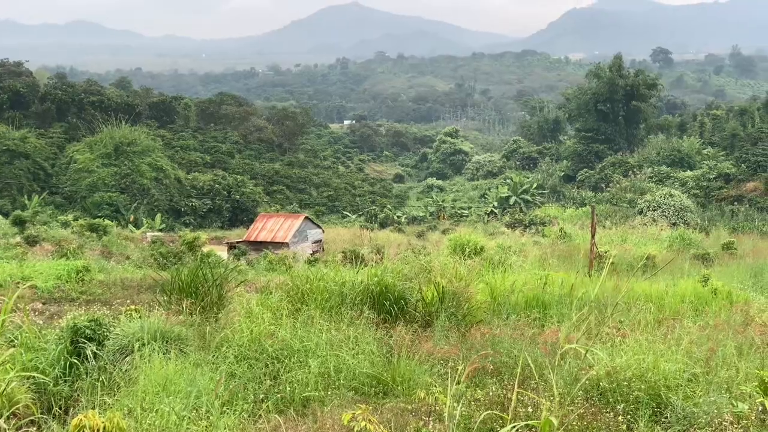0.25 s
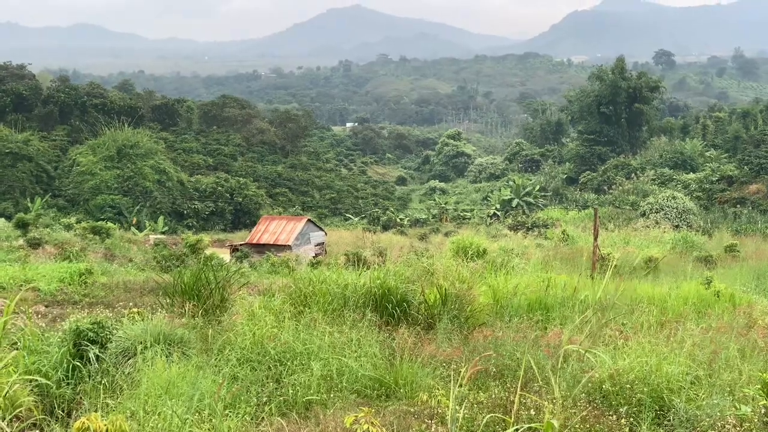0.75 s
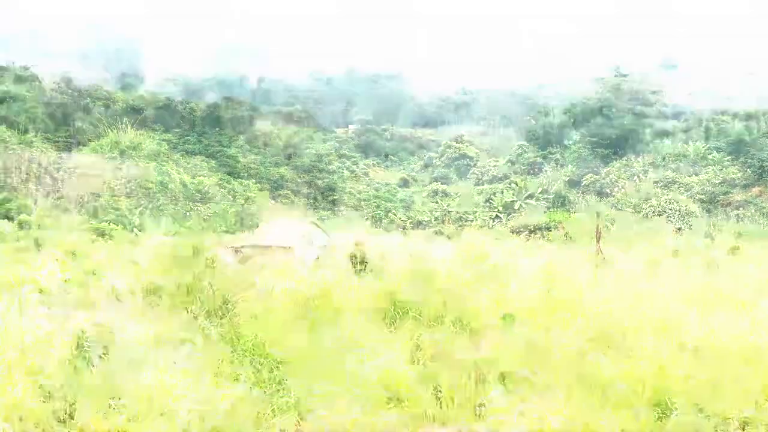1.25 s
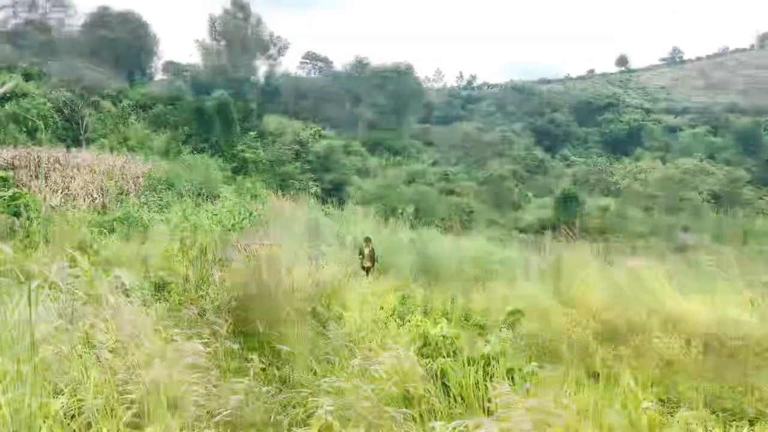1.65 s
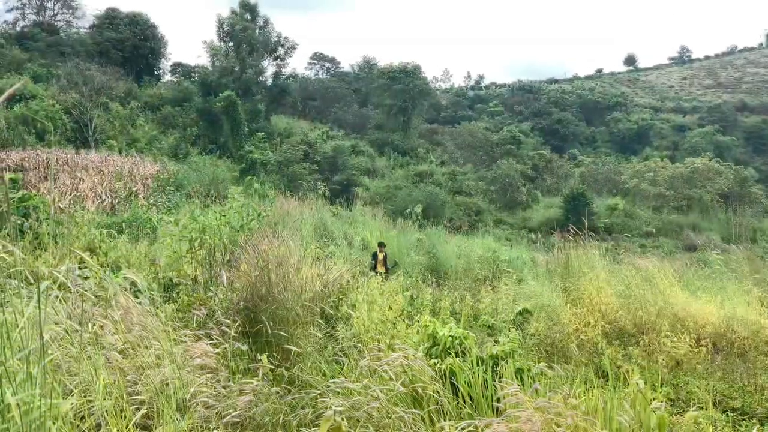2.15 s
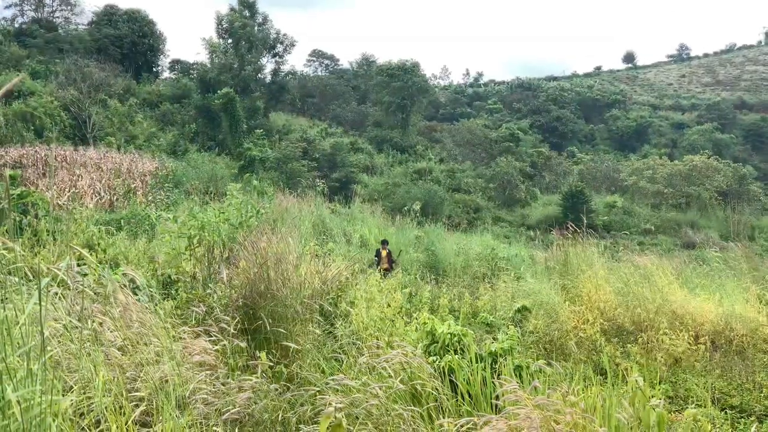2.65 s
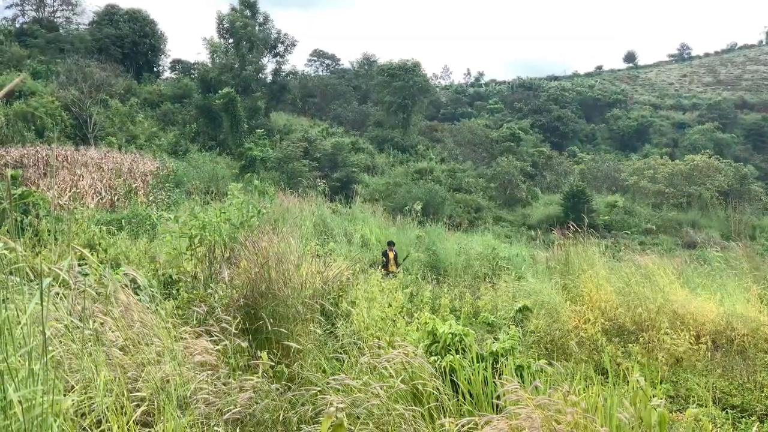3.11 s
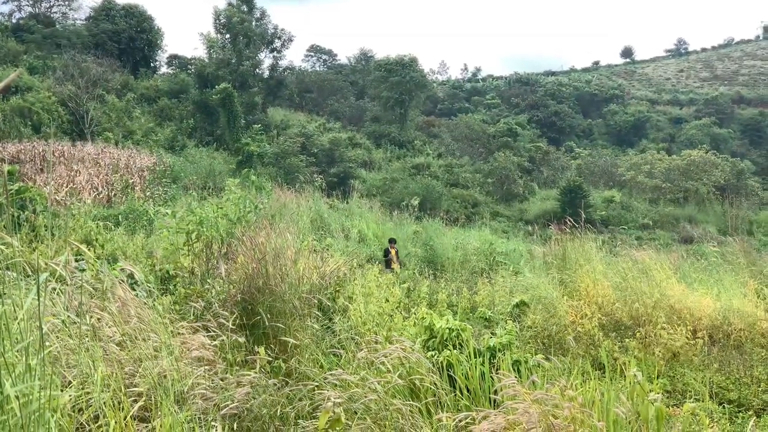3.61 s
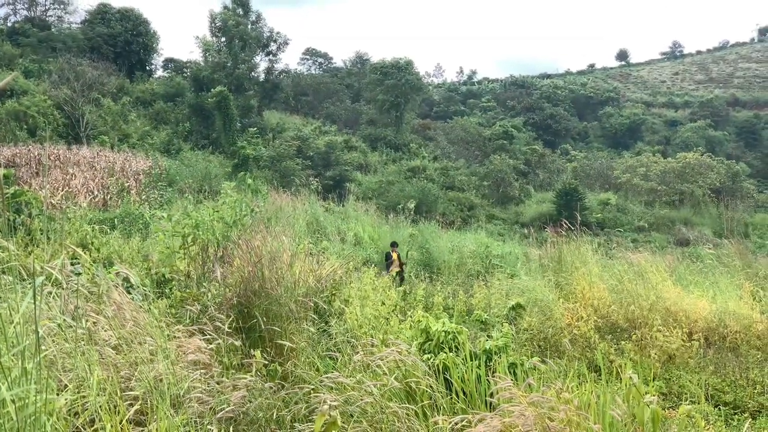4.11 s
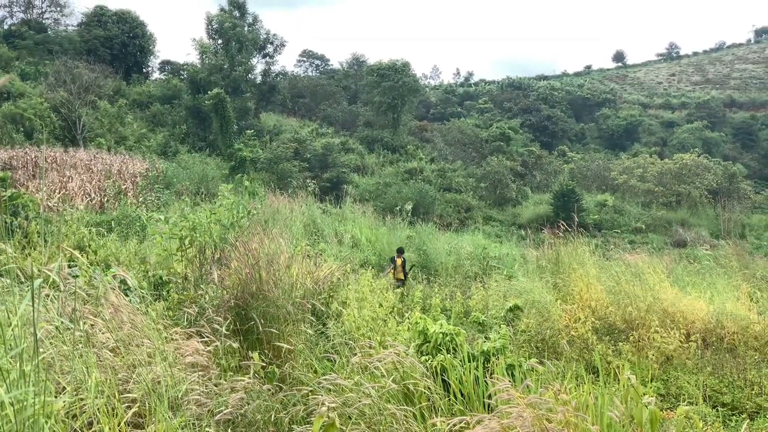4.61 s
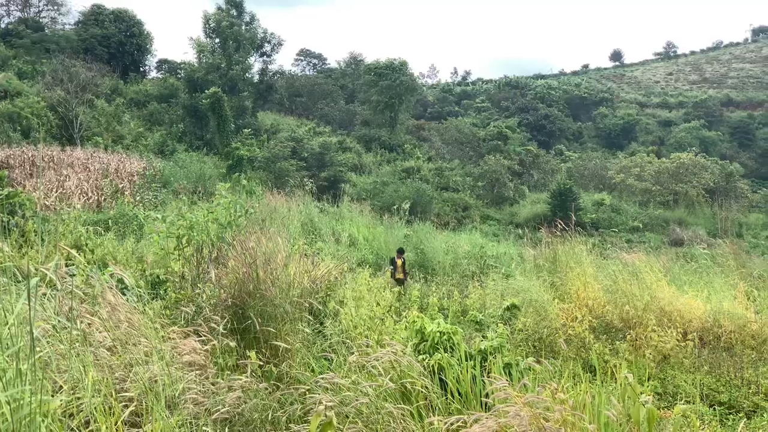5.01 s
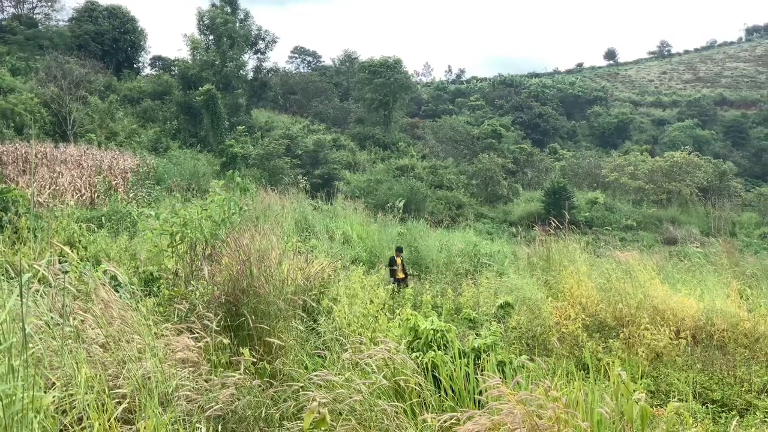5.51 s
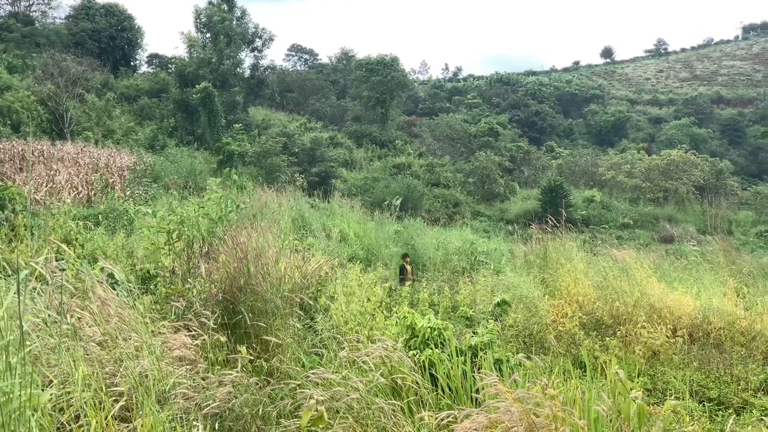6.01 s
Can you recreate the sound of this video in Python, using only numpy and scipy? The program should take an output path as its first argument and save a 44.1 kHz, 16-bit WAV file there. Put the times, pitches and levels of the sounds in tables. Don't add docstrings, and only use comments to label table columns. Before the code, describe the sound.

A quiet outdoor stereo pickup starts with low chugging engines, hum and thin insects, overlaps briefly with a second field, then drops the engines. A deep distant drone swells irregularly beneath continuous high cicada buzz, hissing katydids and pulsing crickets. Near the middle a bird gives a husky flurry of upward slurs and several shorter chips. Dry stems tick in a light breeze.

```python
import sys
import numpy as np
from scipy import signal
from scipy.fft import rfft, irfft, next_fast_len
from scipy.io import wavfile
from scipy.ndimage import uniform_filter1d

SR = 44100
rng = np.random.default_rng(int(sys.argv[2]) if len(sys.argv) > 2 else 0)


def how_loud(loudness_db):
    steps = np.asarray(loudness_db, float) / 20
    return 10 ** steps


def digitize_waveform(pressure):
    field = np.atleast_2d(pressure).T
    bounded = np.clip(field, -1, 1)
    quanta = np.round(bounded * 32767).astype(np.int16)
    wavfile.write(sys.argv[1], SR, quanta)


N = 276066
T = np.arange(N) / SR
M = next_fast_len(N, True)
F = np.maximum(np.arange(M // 2 + 1) * SR / M, 1.)

FIRST_END_S, SECOND_START_S = 1.8, 0.7974

QUICK_HZ, QUICK_PIPE = 28.96, [(287.3, 56, 0), (347, 50, -4), (500, 95, -15.5), (766, 590, -26)]
SLOW_HZ, SLOW_PIPE = 13.8, [(163, 36, 0), (94, 52, -6.5)]

SHAFT_HZ, HARMONICS = 96.95, [(1, -72.5), (6, -80), (7, -81), (8, -84), (9, -85.5), (12, -99)]

# (time_s, level_db)
DRONE_CARRY = [(.8, -41.5), (1.0, -51), (1.22, -43.5), (1.5, -56.5), (2.0, -67), (2.4, -55.5), (3.0, -57),
               (3.28, -53.5), (3.34, -42), (3.75, -43.5), (4.25, -42), (4.55, -49), (4.9, -55),
               (5.42, -40.5), (5.55, -45.5), (5.76, -41), (6.1, -47), (6.26, -58)]
DRONE_START_HZ, DRONE_RISE_HZ_PER_S, DRONE_TOP_HZ = 63.74, 1.2, 69.1
DRONE_BLUR_DB, DRONE_WASH_DB = -11.5, -56.5

# (drum_hz, width_hz, click_rate_hz, level_db, right_lag_ms)
CICADA_DRUMS = [(6180, 160, 56.3, -4, 0.314), (6286, 240, 75, -7, 0.306), (5990, 420, 110, -4, 0.3),
                (6250, 480, 37, -6.5, 0.17)]
CICADA_DB = -68

# (frequency_hz, level_db per Hz)
KATYDID_SPECTRUM = [(7600, -43), (8100, -17.5), (8800, -25), (9500, -18.5), (11000, -15), (12500, -11.5),
                    (14000, -4), (15000, -4), (15700, 3.5), (16500, -5.5)]
KATYDID_DB = -66.5

CHIRP_FIRST_S, CHIRP_PERIOD_S, CHIRP_PAIR_S = .903, .2184, 0.047
CHIRP_DB, CHIRP_PEAK_S, CHIRP_FADE_DB_PER_S, CHIRP_SCATTER_DB = -61, 3.8, 1.3, 1.0

FAR_BEATS_S = [s for s in .7645 + .2295 * np.arange(24) if not 2.7 < s < 4.85]

# (centre_s, peak_db, half_length_s)
CRICKET_BEADS = [(0.83, -75, 0.011), (0.972, -82, 0.018), (1.128, -76, 0.013), (1.218, -72, 0.0074),
                 (1.277, -78, 0.028), (1.377, -76, 0.012), (1.543, -82, 0.012), (1.64, -82, 0.009),
                 (1.67, -76, 0.0099), (1.777, -78, 0.011), (1.864, -74, 0.012), (1.998, -80, 0.012),
                 (2.736, -72, 0.016), (2.784, -76, 0.008), (2.862, -75, 0.01), (2.919, -79, 0.018),
                 (3.034, -77, 0.012), (3.073, -81, 0.014), (3.12, -79, 0.013), (3.335, -75, 0.01),
                 (3.377, -78, 0.014), (3.451, -76, 0.012), (3.588, -78, 0.016), (3.771, -78, 0.019),
                 (3.834, -77, 0.016), (3.934, -82, 0.011), (4.17, -79, 0.0087), (4.205, -76, 0.0089),
                 (4.247, -78, 0.014), (4.303, -70, 0.014), (4.354, -73, 0.012), (4.403, -71, 0.0097),
                 (4.441, -80, 0.0073), (4.466, -76, 0.0082), (4.527, -75, 0.019), (4.583, -77, 0.012),
                 (4.633, -79, 0.013), (4.724, -78, 0.01), (4.761, -75, 0.013), (4.856, -74, 0.012),
                 (4.884, -74, 0.006), (4.915, -77, 0.008), (5.008, -74, 0.01), (5.032, -74, 0.01),
                 (5.181, -74, 0.012), (5.246, -79, 0.018), (5.295, -74, 0.008), (5.4, -76, 0.019),
                 (5.481, -75, 0.0073), (5.51, -71, 0.0092), (5.616, -78, 0.01), (5.683, -85, 0.02),
                 (5.773, -82, 0.023), (5.856, -82, 0.019), (5.934, -75, 0.012), (5.989, -74, 0.017),
                 (6.07, -81, 0.012), (6.135, -78, 0.012), (6.207, -72, 0.01), (6.236, -72, 0.01)]

# (start_s, length_s, start_hz, end_hz, peak_db)
SLURRED_NOTES = [(2.148, 0.062, 3390, 3420, -65.5), (2.198, 0.032, 3440, 3500, -63),
                 (2.222, 0.023, 3280, 3890, -62.5), (2.152, .07, 4020, 3700, -68),
                 (2.14, .1, 5000, 5150, -72), (2.284, 0.027, 3050, 3450, -66),
                 (2.297, 0.052, 3350, 3680, -60.5), (2.314, .078, 2800, 3950, -65.5),
                 (2.345, .045, 3900, 4330, -63), (2, 0.059, 3900, 4400, -69),
                 (2.353, 0.0204, 1800, 2230, -62.5), (2.417, 0.067, 3240, 4900, -64.5),
                 (2.435, 0.08, 3000, 4450, -59), (2.485, 0.051, 3800, 3900, -64.5),
                 (2.464, 0.0454, 2000, 2280, -62), (2.568, 0.076, 3000, 5700, -59),
                 (2.58, 0.045, 3000, 4500, -60.5), (2.588, 0.0403, 1950, 2600, -61.5),
                 (2.618, 0.026, 2100, 3350, -62.5), (2.6, 0.044, 4100, 5900, -63)]

# (start_s, length_s, top_hz, peak_db)
HOOKED_CHIPS = [
    (2.736, .062, 3400, -60),
    (2.889, .044, 3520, -60),
    (3.011, .04, 3420, -64.5),
    (3.122, .04, 3280, -66),
    (3.226, .042, 3250, -68),
    (3.33, .038, 3150, -68),
]
CHIP_START_HZ, CHIP_HOOK_HZ, CHIP_TURN = 1500, 700, .68
HAZE_T60_S, HAZE_DB, RASP_DB = .22, -30.5, 1.5

# (start_s, peak_db, rustle_length_s)
GRASS_TICKS = [(1.655, -68.5, 0.054), (2.14, -74, 0.034), (2.4886, -72, 0.025), (3.0076, -86, 0.036),
               (3.252, -71, 0.026), (3.508, -70, 0.029), (3.775, -70, 0.0319), (4.3, -66.5, 0.035),
               (4.3615, -67, 0.03), (4.681, -90, 0.028), (5.2021, -89, 0.028), (5.853, -65.5, 0.016)]

# (centre_s, half_length_s, level_db)
GUSTS = [
    (2.768, 0.054, -76),
    (4.327, 0.13, -74.5),
]

# (start_s, length_s, start_hz, end_hz, peak_db)
FAR_WHISTLES = [
    (.62, .09, 3250, 3350, -80),
    (3.331, .018, 1800, 2450, -71),
    (5.985, .025, 3250, 2650, -79),
    (3.37, .16, 2300, 1950, -85),
    (5.375, .135, 4000, 5550, -80.5),
]
TWITTER_FIRST_S, TWITTER_PERIOD_S, TWITTER_NOTE_S = 5.782, .068, .026
TWITTER_HZ, TWITTER_DROP_HZ = 2900, 260
TWITTER_DB, TWITTER_FADE_DB_PER_NOTE = -78.5, 1.2

# (time_s, level_db against calm)
BREEZE_SWELL = [(.8, -1), (2.0, -1), (2.5, -1.5), (3.4, 3.5), (3.9, 2.5), (4.65, -2.5), (5.4, 3.5),
                (5.7, 1), (6.26, 0.5)]

# (frequency_hz, level_db per Hz)
FIRST_AIR, FIRST_AIR_SIDE = [(25, -20), (45, -0.5), (70, 2), (130, -6), (250, -11), (450, -20.5),
                             (1000, -33), (2000, -32), (3200, -35), (5200, -33.5), (6900, -88)], [(15, -46), (25, -12), (57, 8), (95, -8.5), (305, -4.5),
                                           (436, -13.5), (2280, -22.5), (5200, -24), (6760, -56),
                                           (7400, -100)]
SECOND_AIR, SECOND_AIR_SIDE = [(25, -35), (50, -6.5), (80, -6.5), (130, -14.5), (200, -24.5), (300, -26),
                               (450, -28), (750, -36.5), (1020, -33.5), (1500, -41.5), (2100, -40.5),
                               (2900, -48), (5200, -50), (7000, -104)], [(25, -25), (75, -7.5), (220, -26), (1000, -28.5), (2000, -30),
                                             (3000, -38), (5200, -40), (7000, -91)]
FIRST_AIR_DB, FIRST_AIR_SIDE_DB = -58, -65.5
SECOND_AIR_DB, SECOND_AIR_SIDE_DB = -55.5, -69.5

# (frequency_hz, threshold_db)
DROPOUT_THRESHOLD = [(2300, -80), (2700, -13.5), (3700, -13), (4300, -13.5), (4800, -13), (5300, -16),
                     (5700, -21), (6600, -20), (7150, -16), (7380, -9.5), (7550, -13.5), (7750, -17),
                     (8150, -15), (8500, -6), (8900, -3), (9600, -7.5), (10700, -7.5), (11700, -5),
                     (15000, -11)]


def level(x, db):
    return x * how_loud(db) / np.sqrt(np.mean(x ** 2))


def shape(points):
    hz, db = np.transpose(points)
    return how_loud(np.interp(np.log(F), np.log(hz), db))


def ring(hz, width):
    return 1 / (1 + 1j * (F ** 2 - hz ** 2) / (F * width)) ** 2


def filtered(x, response):
    return irfft(rfft(x, M) * response, M)[..., :N]


def ports(x, lag_ms, pan_db=0.):
    right = filtered(x, np.exp(-2j * np.pi * F * lag_ms / 1000))
    return np.array([x * how_loud(pan_db / 2), right * how_loud(-pan_db / 2)])


def walk(rate):
    hold = int(SR / rate)
    steps = np.repeat(rng.standard_normal(N // hold + 1), hold)
    return 1.3 * uniform_filter1d(uniform_filter1d(steps, hold), hold)[:N]


def phase(hz, wander):
    return np.cumsum(hz * (1 + wander * walk(12))) / SR


def pulses(rows):
    gate = np.zeros(N + SR)
    reach = np.arange(-4000, 4000)
    for s, db, half_s in rows:
        gate[int(s * SR) + reach] += how_loud(db) * np.exp(-(reach / SR / half_s) ** 2)
    return gate[:N]


def engine(hz, first_s, pipe, db):
    at = np.flatnonzero(np.diff(np.floor(phase(hz, 0.002) - hz * first_s)))
    bangs = np.zeros(N)
    bangs[at] = how_loud(rng.standard_normal(len(at)))
    response = sum((-1) ** k * how_loud(g) * ring(f, w) for k, (f, w, g) in enumerate(pipe))
    return level(filtered(bangs, response), db)


def generator():
    turns = phase(SHAFT_HZ, 0.00091)
    hum = 0
    for k, db in HARMONICS:
        hum = hum + how_loud(db + 2.0 * walk(8.6)) * np.sqrt(2) * np.sin(2 * np.pi * k * turns)
    return hum


def drone():
    hz = np.minimum(DRONE_START_HZ + DRONE_RISE_HZ_PER_S * (T - SECOND_START_S), DRONE_TOP_HZ)
    tone = np.sqrt(2) * np.sin(2 * np.pi * phase(hz, 0.015)) * how_loud(1.3 * walk(9))
    low_band = ring(62.6, 30)
    blur = level(filtered(rng.standard_normal(N), low_band), DRONE_BLUR_DB)
    wash = level(filtered(rng.standard_normal(N), low_band), DRONE_WASH_DB)
    return (tone + blur) * how_loud(np.interp(T, *np.transpose(DRONE_CARRY))) + wash


def far_chorus(hz, width, db):
    noise = rng.standard_normal((2, N))
    return level(filtered(noise, ring(hz, width)) * how_loud(0.86 * walk(30)), db)


def cicadas():
    out = far_chorus(6330, 800, -4)
    for hz, width, rate, db, lag_ms in CICADA_DRUMS:
        volley = np.exp(0.7 * np.cos(2 * np.pi * phase(rate, 0.0087))) * rng.standard_normal(N)
        out = out + ports(level(filtered(volley, ring(hz, width)), db), lag_ms, -2.4)
    return out


def katydids(throb):
    hiss = shape(KATYDID_SPECTRUM)
    scrape = np.exp(throb * np.cos(2 * np.pi * phase(36, .03)) + .1 * walk(8) + .16 * walk(18))
    near = ports(level(filtered(scrape * rng.standard_normal(N), hiss), 0), -.3008)
    return near + level(filtered(rng.standard_normal((2, N)), hiss), -17.5)


def chirping_cricket():
    beats = CHIRP_FIRST_S + CHIRP_PERIOD_S * np.arange(25)
    starts = np.concatenate([beats, beats + CHIRP_PAIR_S])
    db = CHIRP_DB - CHIRP_FADE_DB_PER_S * abs(starts - CHIRP_PEAK_S)
    db = db + CHIRP_SCATTER_DB * rng.standard_normal(len(starts))
    near_rows = [(s, g, .014) for s, g in zip(starts, db)]
    far_rows = [(s + gap, -70, .014) for s in FAR_BEATS_S for gap in (0, .054)]
    gate = pulses(near_rows + far_rows)
    tone = gate * how_loud(3 + 2 * walk(150)) * np.sin(2 * np.pi * phase(7225, .004))
    scattered = filtered(gate * rng.standard_normal((2, N)), ring(7200, 190))
    return ports(tone, .345, -4.0) + how_loud(12.5) * scattered + far_chorus(6950, 420, -79)


def low_cricket():
    swell = pulses(CRICKET_BEADS) + how_loud(-84 + 4 * walk(30))
    strength = how_loud(-.5 + 1.5 * walk(90) - 2.5 * (T < 3.3))
    return swell * strength * np.sin(2 * np.pi * phase(4002, .003))


def trill(hz, db, depth, rate, uneven_db):
    beat = 1 - depth * np.cos(np.pi * phase(rate, 0.18)) ** 2
    return beat * how_loud(db + uneven_db * walk(22)) * np.sin(2 * np.pi * phase(hz, .001))


def slurs():
    song, effort = np.zeros((2, N))
    for s, length, start_hz, end_hz, db in SLURRED_NOTES:
        u = np.clip((T - s) / length, 0, 1)
        swell = how_loud(db) * abs(np.sin(np.pi * u)) ** .7
        song += swell * np.sin(2 * np.pi * np.cumsum(start_hz + (end_hz - start_hz) * u) / SR)
        effort += swell * (start_hz > 2500)
    return song, effort


def chips():
    out = np.zeros(N)
    rise = CHIP_TURN ** 2
    hook = CHIP_HOOK_HZ / (1 - CHIP_TURN) ** 2
    for s, length, top_hz, db in HOOKED_CHIPS:
        u = np.clip((T - s) / length, 0, 1)
        bend = np.where(u < CHIP_TURN, (top_hz - CHIP_START_HZ) / rise, hook)
        hz = top_hz - bend * (u - CHIP_TURN) ** 2
        flutter = 1 + .6 * u * np.sin(2 * np.pi * 400 * T)
        swell = how_loud(db) * flutter * abs(np.sin(np.pi * u)) ** .45
        out += swell * np.sin(2 * np.pi * np.cumsum(hz) / SR)
    return out


def bird():
    song, effort = slurs()
    throat = .75 * abs(ring(3400, 900)) + .35 * abs(ring(2480, 300)) + .9 * abs(ring(2000, 350)) + .35
    song, chip = filtered(np.array([song, chips()]) * how_loud(2.8 * walk(300)), throat)
    chip = chip + how_loud(-19) * filtered(np.roll(chip, int(.046 * SR)), ring(3400, 700))
    song = song + how_loud(RASP_DB) * filtered(effort * rng.standard_normal(N), ring(4200, 1300))
    age = T[:SR // 4]
    haze = rng.standard_normal((2, len(age))) * np.exp(-np.log(1000) * age / HAZE_T60_S)
    scattered = how_loud(HAZE_DB) * filtered(song + chip, rfft(haze, M))
    return ports(song, .31, -1.5) + how_loud(3) * ports(chip, 1.2) + scattered


def grass():
    gate = np.zeros(N)
    for s, db, length in GRASS_TICKS:
        age = np.maximum(T - s, 0)
        decay = np.exp(-age / 0.0041) + 0.29 * np.exp(-age / length)
        gate += (T >= s) * how_loud(db) * decay
    for s, half_s, db in GUSTS:
        gate += how_loud(db) * np.exp(-((T - s) / half_s) ** 4)
    grains = rng.standard_normal(N) * how_loud(2.2 * rng.exponential(size=N))
    rustle = level(filtered(grains, ring(9000, 6000) + .5 * ring(4000, 2000)), 0)
    return ports(rustle * gate, -.2)


def far_birds():
    twitter = []
    for k in range(7):
        db = TWITTER_DB - TWITTER_FADE_DB_PER_NOTE * abs(k - 3)
        start_s = TWITTER_FIRST_S + k * TWITTER_PERIOD_S
        twitter.append((start_s, TWITTER_NOTE_S, TWITTER_HZ, TWITTER_HZ - TWITTER_DROP_HZ, db))
    out = 0
    for s, length, start_hz, end_hz, db in [*FAR_WHISTLES, *twitter]:
        u = np.clip((T - s) / length, 0, 1)
        turns = np.cumsum(start_hz + (end_hz - start_hz) * u) / SR
        out = out + how_loud(db) * np.sqrt(abs(np.sin(np.pi * u))) * np.sin(2 * np.pi * turns)
    return out * how_loud(4 * walk(200))


def air(mid, side, mid_db, side_db, breeze_db):
    noise = rng.standard_normal((2, N))
    common = level(filtered(noise[0], shape(mid)), mid_db)
    differing = level(filtered(noise[1], shape(side)), side_db)
    spectra = rfft([common, differing], M)
    place = np.clip(1.5 * np.log2(F / 100), 0, 9)
    bed = 0
    for k in range(10):
        register = irfft(spectra * np.maximum(1 - abs(place - k), 0), M)[:, :N]
        swell = breeze_db * np.interp(k, [0, 2, 4, 6], [0, 1, 1, .1])
        bed = bed + register * how_loud(swell + 1.86 * walk(4.48) + 2.0 * walk(15))
    return np.array([bed[0] + bed[1], bed[0] - bed[1]])


def first_field():
    engines = engine(QUICK_HZ, .01, QUICK_PIPE, -65) + engine(SLOW_HZ, 0.02395, SLOW_PIPE, -62.5)
    out = ports(engines + generator(), 0.018, -0.17)
    out = out + far_chorus(5940, 570, -64.0) + ports(far_chorus(6205, 170, -66.5)[0], 0.304, -2.0)
    out = out + how_loud(-70.5) * katydids(0.18) + far_chorus(8050, 500, -84)
    return out + air(FIRST_AIR, FIRST_AIR_SIDE, FIRST_AIR_DB, FIRST_AIR_SIDE_DB, 0)


def second_field():
    out = ports(drone(), 0.011, -2.4)
    out = out + cicadas() * how_loud(CICADA_DB + 0.69 * walk(3))
    out = out + katydids(0.15) * how_loud(KATYDID_DB + walk(8) + 1.2 * walk(20))
    out = out + chirping_cricket() + ports(low_cricket(), 0.032, 0.9)
    out = out + far_chorus(8080, 700, -81.5) + far_chorus(7700, 250, -90)
    out = out + ports(trill(7884, -83.5, .9, 35.5, 3.5), -0.0042, -1.2) + bird()
    breeze_db = np.interp(T, *np.transpose(BREEZE_SWELL))
    return out + air(SECOND_AIR, SECOND_AIR_SIDE, SECOND_AIR_DB, SECOND_AIR_SIDE_DB, breeze_db)


def scene():
    leaving = np.clip((FIRST_END_S - T) / 0.0048, 0, 1)
    entering = np.clip((T - SECOND_START_S) / 0.0174, 0, 1)
    fields = first_field() * leaving + second_field() * entering
    return fields + grass() + ports(far_birds(), 0.015)


def band_gated(x):
    hz, _, z = signal.stft([x[0] + x[1], x[0] - x[1]], SR, "cosine", 2048, 1024)
    own = uniform_filter1d(abs(z) ** 2, size=9, axis=1)
    around = uniform_filter1d(own.sum(axis=0), size=110, axis=0)
    threshold_db = np.interp(hz, *np.transpose(DROPOUT_THRESHOLD))[:, None]
    keep = own > around * how_loud(2 * threshold_db + 6 * rng.standard_normal(own.shape))
    band = np.minimum(np.arange(len(hz)) // 8 * 8 + 4, len(hz) - 1)
    mid, side = signal.istft(z * keep[:, band], SR, "cosine", 2048, 1024)[1][:, :N]
    return np.array([mid + side, mid - side]) / 2


def band_limit(x):
    return signal.sosfilt(signal.butter(12, 15700, fs=SR, output="sos"), x)


def record(dry):
    bass_loss = 1 / (1 + (30 / F) ** 4)
    return band_limit(band_gated(filtered(dry, bass_loss)))


dry = scene()
out = record(dry)
digitize_waveform(out)
```